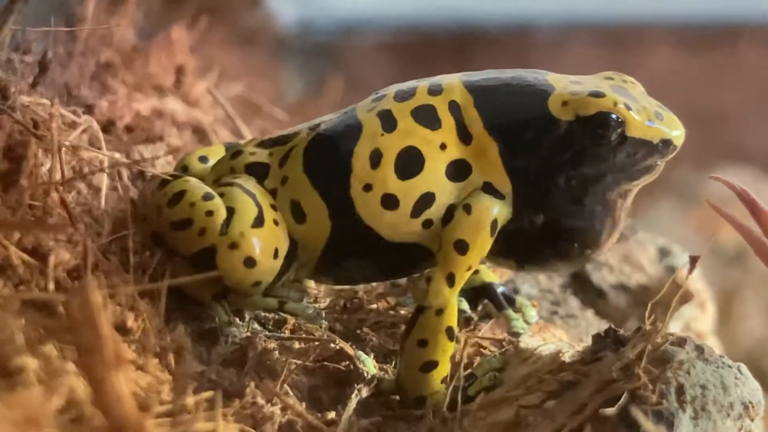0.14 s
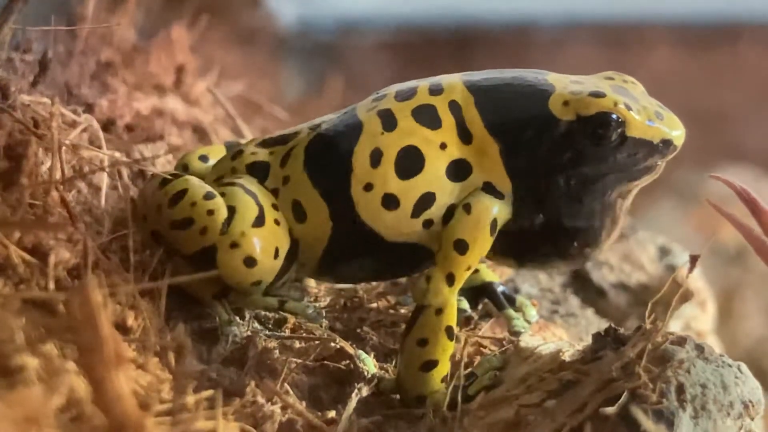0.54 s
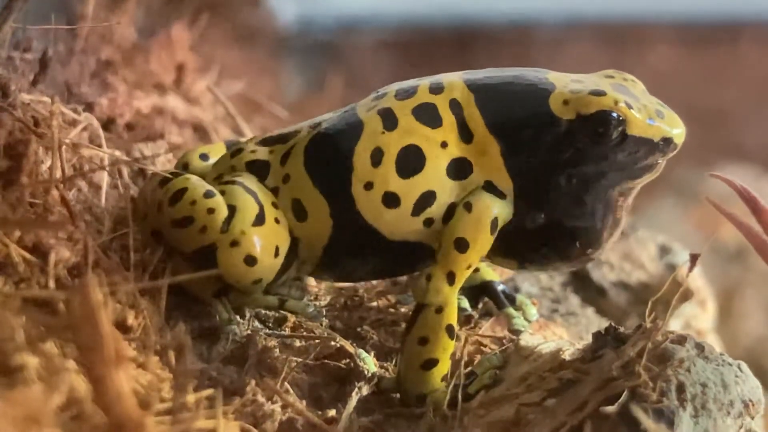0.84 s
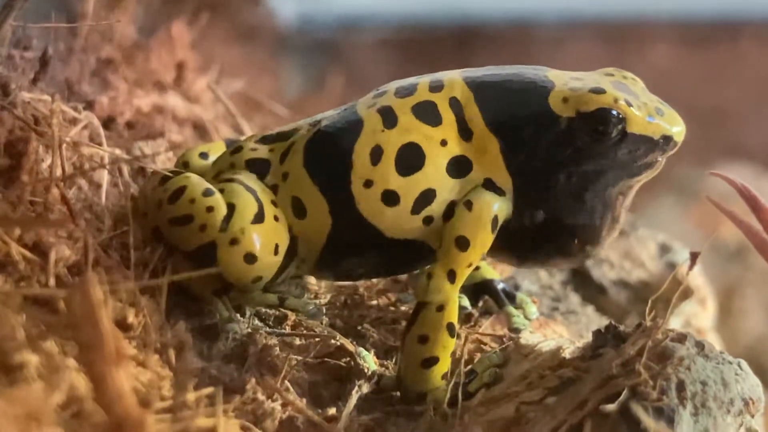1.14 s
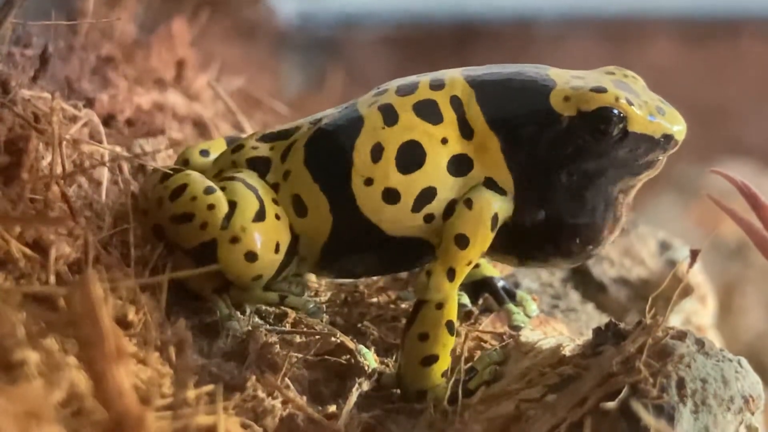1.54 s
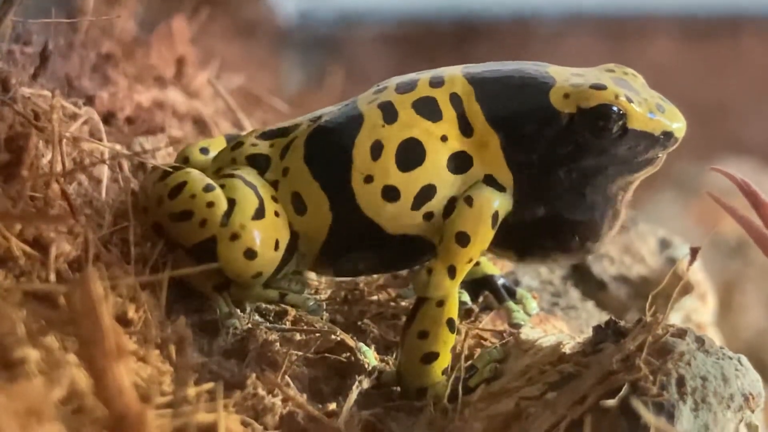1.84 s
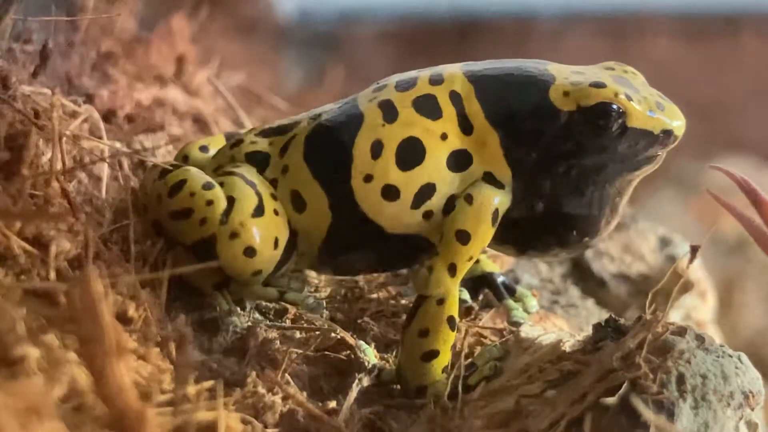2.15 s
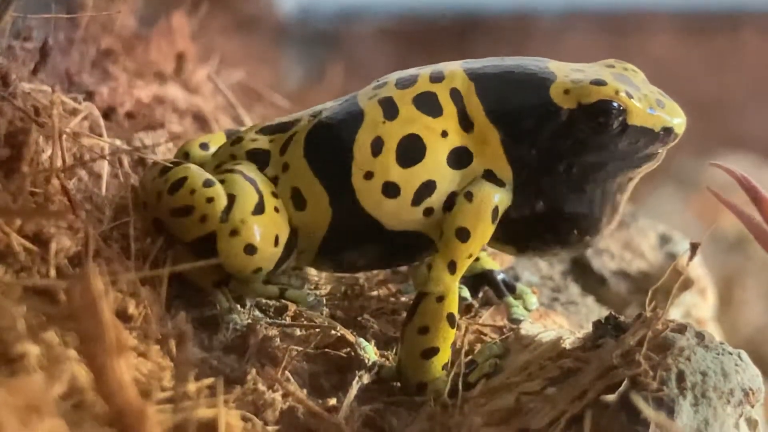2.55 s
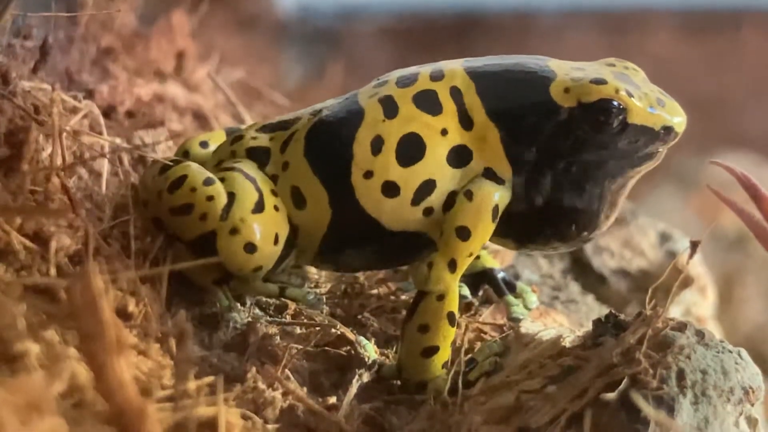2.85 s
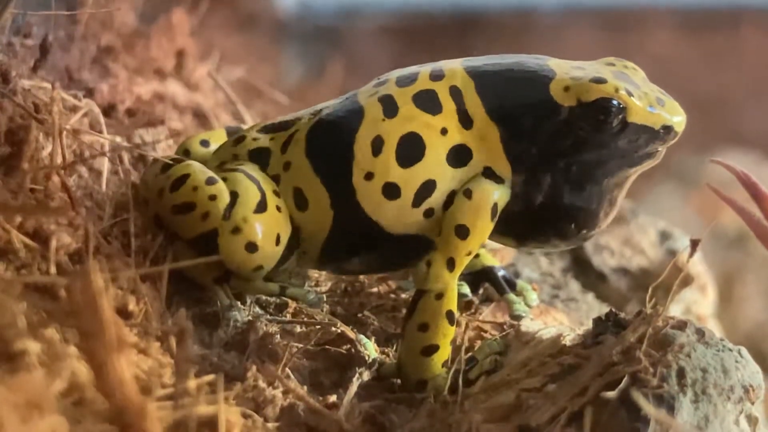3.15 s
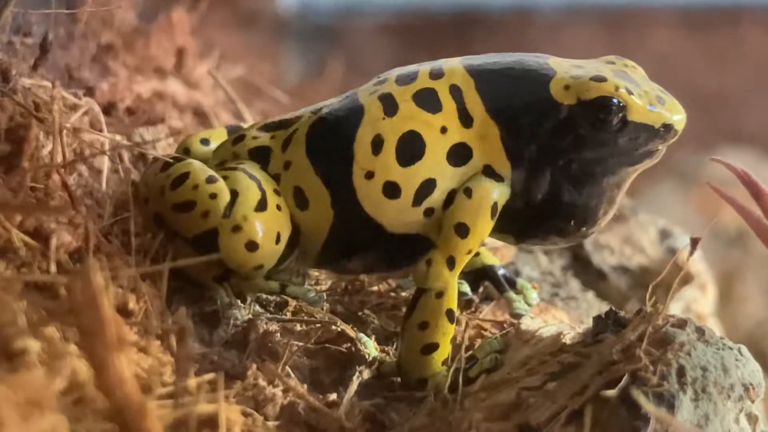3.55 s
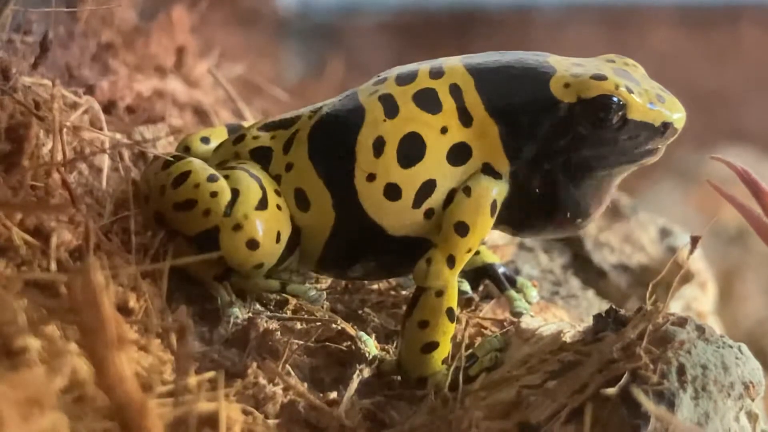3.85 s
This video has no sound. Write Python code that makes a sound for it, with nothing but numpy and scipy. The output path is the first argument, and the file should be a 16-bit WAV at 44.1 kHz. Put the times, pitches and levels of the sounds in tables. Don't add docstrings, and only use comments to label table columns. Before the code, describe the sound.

Continuous rapid frog trill, already under way at the start and lasting to about 3.5 seconds, then room echo fades into quiet rumble; soft handling bumps and faint ticks, near stereo phone microphone.

```python
import sys
import numpy as np
from scipy import signal
from scipy.io import wavfile
from scipy.ndimage import uniform_filter1d

SR = 44100
rng = np.random.default_rng(int(sys.argv[2]) if len(sys.argv) > 2 else 0)


def pcm_store(signal):
    levels = np.round(np.clip(np.atleast_2d(signal), -1, 1) * 32767)
    wavfile.write(sys.argv[1], SR, levels.astype(np.int16).T)


def invert_db(level):
    return 10 ** (np.asarray(level, dtype=float) / 20)


N = 176400
LEAD_S = 0.024
QUIET_BAND_START_HZ = 8250
SKIP_START_S, SKIP_END_S = 3.4235, 3.468


def read(points, hz):
    f, value = np.transpose(points)
    return np.interp(np.log(hz + 1), np.log(f + 1), value)


def evened(x):
    return x / np.sqrt(np.mean(x ** 2) + 1e-20)


def add(mix, s, sound):
    at = round(s * SR)
    part = mix[max(at, 0):][:len(sound) + min(at, 0)]
    part += sound[max(-at, 0):][:len(part)]


def smooth_noise(size, width):
    step = max(round(width / 2), 1)
    once = uniform_filter1d(rng.standard_normal(size), step)
    return evened(uniform_filter1d(once, step))


def note(sweep_chance, steady_chance, pitch_chance):
    after_s, attack_s, release_s = 0.0066, 0.0069, 0.0014
    t = np.arange(-LEAD_S, after_s, 1 / SR)
    u = (t + LEAD_S) / (LEAD_S + after_s)
    rough_start, rough_end = 0.7, 0.06
    steady_at = 0.4 + 0.04 * steady_chance
    rough = rough_end + (rough_start - rough_end) / (1 + np.exp((u - steady_at) / 0.08))

    peak_hz, sweep_per_s = 1486.7, 40 * (1 + 0.03 * sweep_chance)
    lock = 0.1013 * np.tanh((t + 0.002) / 0.0041)
    hz = peak_hz * np.exp(sweep_per_s * t - lock + 0.015 * pitch_chance)
    wander, breath = rng.standard_normal((2, len(t)))
    jitter = 0.16 * rough * evened(uniform_filter1d(wander, size=50))
    turns = np.cumsum(hz * np.clip(1 + jitter, 0.3, 2)) / SR

    foot_stack = [-14.5, -2, -4.5, -2, -2, -4.5, -6, -5.5]
    top_stack = [1.92, -3.13, -6, -15.5, -13, -21, -16, -23]
    tone = np.zeros(len(t))
    for k, (low_db, top_db) in enumerate(zip(foot_stack, top_stack), start=1):
        tone += invert_db(low_db + (top_db - low_db) * u ** 2) * np.cos(2 * np.pi * k * turns)
    puffs = breath * (1 + np.cos(2 * np.pi * turns))
    drive = (1 - rough) * evened(tone) + 0.82 * rough * puffs

    swell_db = 9.5 * (u - 1)
    flutter_db = 5 * rough * smooth_noise(4096, 30)[:len(t)]
    attack = np.minimum((t + LEAD_S) / attack_s, 1)
    release = np.minimum((after_s - t) / release_s, 1)
    return attack * release * invert_db(swell_db + flutter_db) * drive


def trill():
    # t/s, effort level/dB
    notes = [(-.0065, 0.5), (0.0725, -1), (0.1734, -1.2), (0.2244, -1.9), (0.303, -0.9),
             (0.3779, -1.1), (0.4554, -1.3), (0.5345, -1.4), (0.612, -1.2), (0.6877, -2),
             (0.764, -0.6), (0.8427, -1.9), (.921, -1.6), (0.9968, -1.25), (1.0742, -0.8),
             (1.1517, -1.35), (1.2321, -1.1), (1.3083, -1.4), (1.3859, -1.7), (1.4637, -1.5),
             (1.5437, -2), (1.6173, -2), (1.6937, -1.5),
             (1.7751, -2.7), (1.8511, -1), (1.931, -1.2), (2.0072, -1.9), (2.0846, -1.7),
                  (2.1624, -1.5), (2.2417, -1.8), (2.319, -2), (2.3988, -1.6), (2.4773, -1.8), (2.5566, -2),
                  (2.6358, -2.6), (2.7136, -1.7), (2.7914, -2), (2.873, -2.1), (2.953, -2), (3.0334, -2.3),
                  (3.113, -1.8), (3.191, -2.5), (3.2713, -2.2), (3.3492, -2.7), (3.4323, -1.5),
                  (3.4897, -3.5)]
    folds = np.zeros(N + SR)
    for s in np.arange(-1, -0.05, 0.0775):
        add(folds, s + 1 - LEAD_S, note(*rng.standard_normal(3)))
    for s, effort_db in notes:
        add(folds, s + 1 - LEAD_S, invert_db(effort_db) * note(*rng.standard_normal(3)))
    return folds


def coloured(x, column):
    # f/Hz, width/Hz, left level/dB, right level/dB, room level/dB
    resonances = [(1060, 370, -39, -25.5, -19.5), (1395, 45, -26, -19, -15.5),
                  (1704, 230, -13.5, -18, -12.5), (2230, 284, -8, -20.5, -18), (2417, 490, -20.5, -7, -5.5),
                  (2732.6, 205, 4.5, -28.5, -2), (2947, 470, -30, -26, -21),
                  (3336, 250, -13.5, -19.5, -17.5), (3570, 360, -18.5, -32, -23),
                  (4162, 240, -24.5, -28.5, -26.5), (4690, 270, -29.5, -37, -28.5),
                  (5525, 1100, -38.5, -35, -26.5), (7050, 390, -39, -37, -52),
                  (7820, 1200, -43, -40, -32.5)]
    hz = abs(np.fft.fftfreq(8192, 1 / SR))
    power = np.zeros(len(hz))
    for row in resonances:
        power += invert_db(2 * row[column]) / (1 + (2 * (hz - row[0]) / row[1]) ** 2) ** 2
    log_gain = np.log(power / (1 + (hz / QUIET_BAND_START_HZ) ** 80) + 1e-13) / 2
    taps = np.fft.ifft(np.exp(np.conj(signal.hilbert(log_gain)))).real[:4096]
    return signal.oaconvolve(x, taps)[:N]


def glass_reflections(folds):
    # delay t/s, left gain, right gain
    panes = [(.0031, 0.022, 0.26), (.0058, -0.0041, 0.77), (0.012, -0.033, -0.28), (0.016, 0.051, -0.053)]
    right_lag_s, right_db = 0.00014, -5.5
    near = []
    for side in (0, 1):
        taps = np.zeros(6000)
        taps[0] = 1
        for row in panes:
            taps[round(row[0] * SR)] = row[1 + side]
        heard = signal.oaconvolve(folds, taps)[SR - round(side * right_lag_s * SR):]
        near.append(invert_db(side * right_db) * coloured(heard, column=2 + side))
    return invert_db(-35) * evened(np.array(near))


def tank_ring(folds):
    t60, edge_hz = 0.051, 9200
    age = np.arange(6000) / SR
    sides = []
    for level_db in (-48, -52):
        ring = invert_db(-60 * age / t60) * rng.standard_normal(len(age)) * (age > 0.002)
        ring = signal.lfilter(*signal.butter(1, edge_hz, fs=SR), ring)
        heard = signal.oaconvolve(folds, ring)[SR:]
        sides.append(invert_db(level_db) * evened(coloured(heard, column=3)))
    return np.array(sides)


def room(folds):
    # f/Hz, t60/s
    decay = [(1000, 0.93), (2700, 0.85), (3300, 0.55), (3700, 0.71), (5000, 0.17), (8000, .2)]
    hz, t, z = signal.stft(rng.standard_normal((2, SR)), SR, nperseg=256)
    fade = invert_db(-60 * t / read(decay, hz)[:, None]) * (t > 0.012)
    tail = signal.istft(z * fade, SR, nperseg=256)[1]
    wet = signal.fftconvolve(folds[None], tail, axes=1)
    far = np.array([coloured(x[SR:], column=4) for x in wet])
    return invert_db(-50) * evened(far)


def skipped(close):
    t = np.arange(N) / SR
    enter = np.clip((t - SKIP_START_S) * 1500 + 1, 0, 1)
    leave = np.clip((SKIP_END_S - t) * 250, 0, 1)
    jumped = enter * leave
    return (1 - jumped) * close + jumped * np.roll(close, round(0.067 * SR), axis=1)


def frog():
    folds = trill()
    close = glass_reflections(folds) + tank_ring(folds)
    return skipped(close) + room(folds)


def floor():
    # f/Hz, coherence
    coherence = [(40, .985), (250, .8), (600, .2), (2000, .4), (8000, .5)]
    # f/Hz, level/dB per Hz
    rumble = [(25, -12), (40, 0), (230, -14.5), (600, -20.5), (1100, -36), (2700, -21), (3700, -41.5),
              (8200, -45.5)]
    # t/s, level/dB
    grip = [(0.0, -61.5), (0.21, -70.5), (0.7, -67), (0.78, -64.5), (1.21, -69.5), (1.44, -66.5),
            (1.57, -67), (1.88, -71), (2.16, -71.5), (2.35, -69), (2.75, -71.5), (2.91, -67.5), (3.44, -67),
            (3.58, -68), (3.79, -71), (4.0, -66)]
    frames, hz = N // 512 + 5, np.fft.rfftfreq(2048, 1 / SR)
    a, b, c, d, patches = rng.standard_normal((frames, 1025, 5)).T
    patches = uniform_filter1d(patches, size=12, axis=0)
    patches = evened(uniform_filter1d(patches, size=5, axis=1))
    same = read(coherence, hz)[:, None]
    left = a + 1j * b
    right = same * left + np.sqrt(1 - same ** 2) * (c + 1j * d)
    z = np.array([left, right]) * invert_db(2.1 * patches)

    grip_db = np.interp(np.arange(frames) * 512 / SR, *np.transpose(grip))
    z = z * invert_db((grip_db - grip_db.mean()) / (1 + (hz[:, None] / 490) ** 4))
    low = invert_db(read(rumble, hz)) * (hz < QUIET_BAND_START_HZ)
    high = np.exp(-((hz - 11500) / 2100) ** 2) * (hz > 9600) * (hz < 13100)
    out = np.zeros((2, N))
    for level_db, gain in ((-65, low), (-93, high)):
        noise = signal.istft(z * gain[:, None], nperseg=2048, noverlap=1536)[1][:, :N]
        out += invert_db(level_db) * evened(noise)
    return out


def thumps():
    # t/s, peak level/dB, sinking/octaves, t60/s
    knocks = [(0.023, -44.5, 4.1, 0.15), (0.198, -48.5, 2.86, 0.085), (0.261, -54.5, 1.3, 0.11),
              (.294, -43, 3.67, 0.25), (0.428, -60, 1.27, 0.3), (0.512, -48.5, 2.53, 0.42),
              (0.583, -45, 2.62, 0.25), (0.629, -63, 2.2, 0.23), (0.699, -45, 1.2, 0.04),
              (0.757, -50.5, 0.93, 0.24), (0.802, -45.5, 2.7, 0.12), (0.875, -52, 2.7, 0.1),
              (.988, -56, 2, 0.3), (1.063, -49.5, 2.72, 0.19), (1.21, -52.5, 1.5, 0.14),
              (1.414, -52.5, 3.56, 0.34), (1.509, -48, 2.32, 0.33), (1.67, -53, 2.5, 0.2),
              (1.943, -67, 1.54, 0.24), (2.324, -52.5, 0.5, 0.64), (2.67, -55, 1.6, 0.14),
              (2.746, -55.5, 2.54, 0.26), (2.805, -52, 1.7, 0.2), (2.97, -49, 2.25, 0.19),
              (3.095, -51, 3, 0.3), (3.302, -53, 0.69, 0.27), (3.44, -50, 2.5, 0.14),
              (3.766, -55, 2.3, 0.28), (3.84, -56, 1.9, 0.21), (3.93, -56, 1.93, 0.15)]
    end_hz, sink_s, tilt_db = 60.9, 0.007, -2.5
    out, t = np.zeros(N), np.arange(SR // 2) / SR
    for s, db, octaves, t60 in knocks:
        hz = end_hz * (1 + (2 ** octaves - 1) * np.exp(-t / sink_s))
        wobble = 1 + 0.3 * smooth_noise(len(t), 150)
        onset = 1 - np.exp(-(t / 0.002) ** 2)
        shape = onset * invert_db(db - 60 * t / t60 + tilt_db * np.log2(hz / end_hz))
        add(out, s, shape * wobble * np.sin(2 * np.pi * np.cumsum(hz) / SR))
    return out


def ticks():
    # t/s, level/dB
    scrapes = [
        (1.3094, -84),
        (1.9964, -65),
        (2.6524, -72),
        (3.9843, -84),
    ]
    centre_hz, width_hz, t60 = 11600, 1500, 0.025
    out, t = np.zeros(N), np.arange(SR // 2) / SR
    for s, db in scrapes:
        grit = smooth_noise(len(t), SR / width_hz)
        shape = invert_db(db - 60 * t / t60) * np.minimum(t / 0.001, 1)
        add(out, s, shape * grit * np.sin(2 * np.pi * centre_hz * t))
    return out


def scene():
    return frog() + floor() + thumps() + ticks()


def top_cut(x):
    return signal.sosfilt(signal.butter(12, 15800, fs=SR, output="sos"), x)


def record(dry):
    dropout_start_s, dropout_end_s, leak_db = 0.1165, 0.1396, -30
    n = np.arange(N)
    recovery = np.clip((n / SR - dropout_end_s) / 0.0002, invert_db(leak_db), 1)
    kept = dry * np.where(n < dropout_start_s * SR, 1, recovery)
    click = invert_db(-46) * (n == 4)
    click = click + invert_db(-55) * (n == int(dropout_start_s * SR))
    click = click + invert_db(-53) * (n == round(SKIP_START_S * SR))
    return top_cut(kept + click)


dry = scene()
out = record(dry)
pcm_store(out)
```